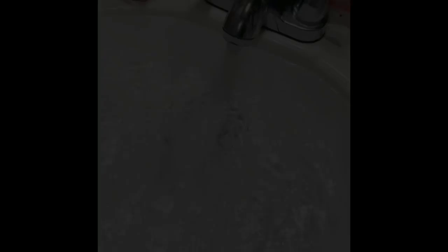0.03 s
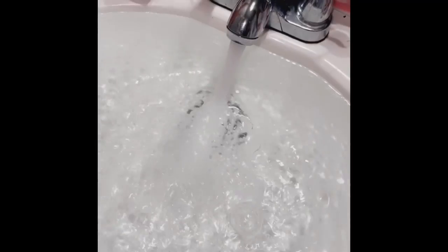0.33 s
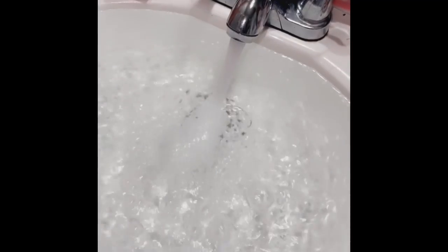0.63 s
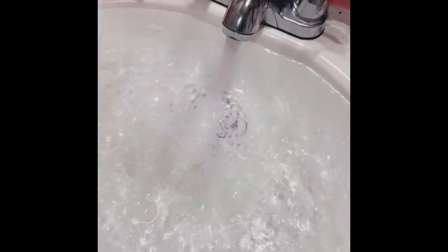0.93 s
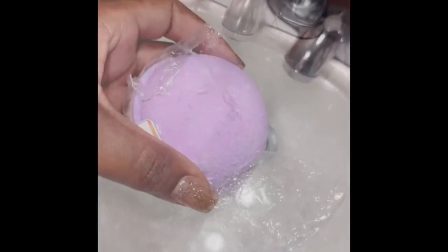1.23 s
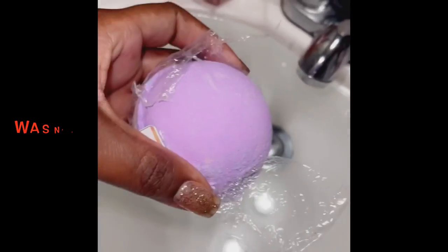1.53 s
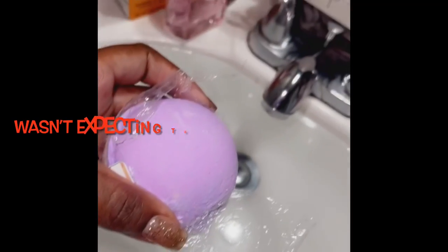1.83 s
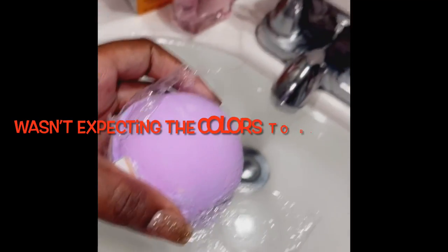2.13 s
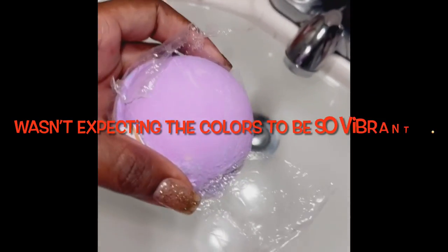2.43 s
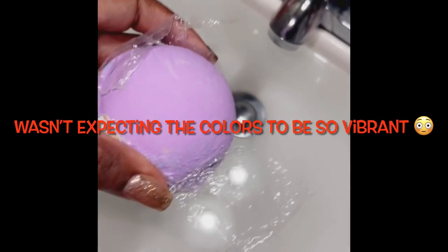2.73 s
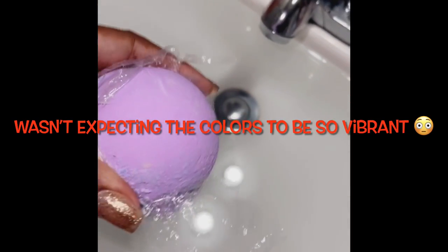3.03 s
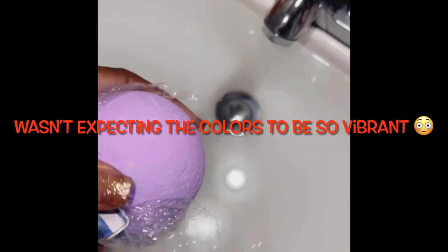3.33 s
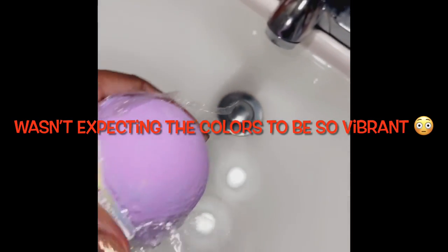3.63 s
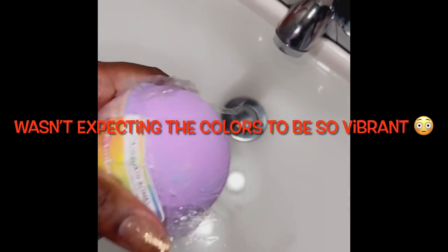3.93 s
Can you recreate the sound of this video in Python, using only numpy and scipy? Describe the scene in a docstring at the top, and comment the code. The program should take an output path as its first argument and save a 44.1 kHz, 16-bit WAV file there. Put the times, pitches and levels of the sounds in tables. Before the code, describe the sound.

Water runs into a basin, followed by fingers crackling the plastic film around a ball.

```python
"""An aerated tap hisses into a bathroom basin, its splash and foam a broadband noise, and fades away.
The steady room drone, probably a fan, grows louder as the recorder's automatic gain recovers after it.
Fingers then turn a ball wrapped in thin plastic film close to the microphone: the film rustles,
crackles in clumps and snaps as creases buckle. The small hard room answers it briefly."""
import sys
import numpy as np
from scipy import signal
from scipy.fft import rfft, irfft, next_fast_len
from scipy.io import wavfile
from scipy.ndimage import map_coordinates

SR = 44100
rng = np.random.default_rng(int(sys.argv[2]) if len(sys.argv) > 2 else 0)


def generate_wav(signal):
    """Clip the signal to [-1, 1] and save it as 16-bit WAV at the path in sys.argv[1]."""
    frames = np.transpose(np.atleast_2d(signal))
    scaled = np.clip(frames, -1, 1) * 32767
    pcm = np.round(scaled).astype(np.int16)
    wavfile.write(sys.argv[1], SR, pcm)


N = 176400
TIME_S = np.arange(N) / SR


def amp(db):
    """The decibel scale: 20 dB is a tenfold amplitude."""
    return 10 ** (np.asarray(db) / 20)

def unit(x):
    """Normalisation to rms 1."""
    return x / np.sqrt(np.mean(x ** 2) + 1e-20)

def curve(rows):
    """Linear interpolation of (time_s, value) rows at every sample."""
    return np.interp(TIME_S, *np.transpose(rows))

def wobble(knots_per_s):
    """Slow random modulation: a spline through Gaussian knots."""
    knots = rng.standard_normal(int(N * knots_per_s / SR) + 4)
    return map_coordinates(knots, [TIME_S * knots_per_s])

def colour(spectrum, hz, resonances=()):
    """Magnitude response: a broad spectrum and its resonances add in power."""
    knot_hz, knot_db = np.transpose(spectrum)
    power = amp(np.interp(np.log(hz + 1), np.log(knot_hz + 1), knot_db)) ** 2
    for centre_hz, width_hz, gain_db in resonances:
        power += amp(gain_db) ** 2 / (1 + ((hz - centre_hz) / width_hz) ** 2) ** 2
    return np.sqrt(power)

def shaped(x, spectrum, resonances=()):
    """Minimum-phase filtering: folding the cepstrum makes the response causal."""
    size = 2 * next_fast_len(len(x) * 5 // 8, True)
    gain = colour(spectrum, np.fft.rfftfreq(size, 1 / SR), resonances)
    cepstrum = irfft(np.log(gain + 1e-9))
    cepstrum[1:size // 2] *= 2
    cepstrum[size // 2 + 1:] = 0
    return irfft(rfft(x, size) * np.exp(rfft(cepstrum)))[:len(x)]

def noise(spectrum, resonances=()):
    """Source and filter: white noise takes on a spectrum, at rms 1."""
    return unit(shaped(rng.standard_normal(N), spectrum, resonances))

def grains(per_s, low_hz, high_hz, decay_cycles, spread_db):
    """Shot noise: tiny damped oscillations add at random times, pitches and strengths."""
    when, pitch, weakness, phase = rng.random((int(per_s * N / SR), 4)).T[:, :, None]
    hz = low_hz + (high_hz - low_hz) * pitch
    age = np.arange(64)
    cycles = hz * age / SR
    gain = amp(-spread_db * np.log(.05 + weakness)) * np.sqrt(hz)
    rings = gain * np.exp(-cycles / decay_cycles) * np.sin(2 * np.pi * (cycles + phase))
    samples = (when * N).astype(int) + age
    return unit(np.bincount(samples.ravel(), rings.ravel(), minlength=N)[:N])

def puffs(rows, spectrum):
    """Amplitude modulation: half-cosine envelopes cut short puffs from coloured noise."""
    envelope = sum(amp(level_db) * np.cos(np.pi * np.clip((TIME_S - centre_s) / length_s, -.5, .5))
                   for centre_s, length_s, level_db in rows)
    return envelope * noise(spectrum)


def reverberation(x, t60_s=0.11, delay_s=0.0026, gain_db=-10.5):
    """Diffuse reflections from basin and walls decay exponentially."""
    t = np.arange(SR // 2) / SR
    tail = rng.standard_normal(len(t)) * amp(-60 * t / t60_s) * (t > delay_s)
    return amp(gain_db) * signal.fftconvolve(x, tail / np.linalg.norm(tail))[:N]


# Steady air noise, heard louder as the recorder's gain recovers: time_s, level_db
AIR_LEVEL = [(.9, -113), (1.1, -66.5), (1.27, -64), (1.42, -59), (1.6, -57.5), (2.2, -55), (2.7, -53.5),
             (3.1, -52), (3.5, -48.5), (4.0, -47)]
# Its broad spectrum: frequency_hz, gain_db
AIR_SPECTRUM = [(25, -20), (60, -5.5), (125, -7), (200, -17.5), (300, -8.5), (420, -4), (720, -8.5),
                (1050, -4.5), (1450, -11.5), (1750, -12), (3000, -20), (4700, -29.5), (6400, -33),
                (7800, -30), (10200, -47), (13500, -43), (15700, -53)]
# Narrow peaks in the drone, among them its low hum: centre_hz, width_hz, gain_db
DRONE_RESONANCES = [(63, 8.2, 5), (144.6, 15.2, 2.5), (167, 6.4, 3), (243.3, 19.7, -3), (414, 10, 0.5),
                    (458, 4.9, 0.5), (496.3, 12, 6.5), (551.6, 18, 0), (635, 10, -2.5), (1060, 41, -1),
                    (1385, 114, -3.5)]
# Steady motor hum, heard louder as the recorder's gain recovers: time_s, level_db
HUM_LEVEL = [(.9, -100), (1.3, -82), (1.6, -64.5), (2.0, -67.5), (3.0, -65), (3.6, -59)]

def drone(hum_hz=165.1, waver_db=2.5):
    """Air noise carries the drone's narrow peaks; a motor hum wavers in amplitude and phase."""
    air = noise(AIR_SPECTRUM, DRONE_RESONANCES)
    waver = amp(waver_db * wobble(6.86))
    phase = 2 * np.pi * hum_hz * TIME_S + 0.43 * wobble(4.96)
    hum = unit(waver * np.sin(phase))
    return amp(curve(AIR_LEVEL)) * air + amp(curve(HUM_LEVEL)) * hum


# A fingertip slides on the film: centre_s, length_s, level_db
FINGER_SLIDES = [(2.182, 0.01, -63), (2.23, 0.11, -69.5)]
# Its bright spectrum: frequency_hz, gain_db
SLIDE_SPECTRUM = [(1000, -19), (6000, -23), (8000, 5), (10300, -8), (13500, -8), (16000, -4)]
# Fingers shift on the ball: centre_s, length_s, level_db
FINGER_RUBS = [(2.93, 0.092, -57), (3.91, 0.19, -57)]
# Their dull spectrum: frequency_hz, gain_db
RUB_SPECTRUM = [(25, -23), (65, 11), (160, 3), (220, -7), (450, 11), (1000, -16), (1500, -4), (3000, -40)]

def finger_friction():
    """Sliding friction makes brief noise: bright on the film, dull on the ball."""
    return puffs(FINGER_SLIDES, SLIDE_SPECTRUM) + puffs(FINGER_RUBS, RUB_SPECTRUM)


# How hard the fingers work the film: time_s, relative_db
HANDLING_LEVEL = [(1.0, -120), (2.1, -99), (2.3, -86), (2.64, -80.5), (2.73, -68), (2.775, -58.5),
                  (2.85, -65.5), (2.91, -58.5), (2.945, -60.5), (3.0, -51.5), (3.1, -58.5), (3.16, -53),
                  (3.225, -61), (3.265, -51.5), (3.345, -55), (3.38, -49.5), (3.405, -45), (3.475, -52.5),
                  (3.487, -45), (3.6, -53.5), (3.67, -47), (3.7, -43.5), (3.73, -48.5), (3.77, -55.5),
                  (3.865, -43), (3.915, -49.5), (4.0, -50)]
# Spectrum of the film, for crinkles and snaps alike: frequency_hz, gain_db
FILM_SPECTRUM = [(100, -41), (400, -0.5), (1100, 3), (2000, -0.5), (3200, -2.5), (4700, -0.5), (6500, -5.5),
                 (7900, 2.5), (9300, -7.5), (10400, -15), (12000, -7.5), (14000, -2.5), (15700, -3)]

def film_crinkle(flutter_db=1.8, gain_db=-1.5):
    """Impulsive crackle and continuous rustle share one envelope, set by the fingers."""
    clicks = grains(per_s=1800, low_hz=710, high_hz=14700, decay_cycles=0.87, spread_db=2.2)
    crackle = unit(shaped(clicks, FILM_SPECTRUM))
    rustle = noise(FILM_SPECTRUM)
    envelope = amp(curve(HANDLING_LEVEL) + gain_db + flutter_db * wobble(110))
    return envelope * (crackle + rustle)


# Single creases giving way: start_s, relative_db, centre_hz, half_width_octaves
CREASE_SNAPS = [(1.978, -54, 7760, 0.53), (2.183, -42, 4620, 1.5), (2.663, -54, 7000, 1.5),
                (2.709, -49, 5000, 1), (2.749, -46.5, 4000, 0.75), (2.7655, -44, 8000, 1.4),
                (2.774, -37, 7900, 1.6), (2.7995, -45, 7000, 1.2), (2.807, -38, 8100, 2),
                (2.833, -44, 13000, 0.72), (2.8951, -35, 6760, 0.72), (2.914, -35.5, 7000, 0.78),
                (2.991, -34, 7500, 1.1), (3.018, -31.5, 3300, 0.78), (3.064, -37, 3660, 0.28),
                (3.074, -39, 4300, 1.2), (3.137, -37.5, 3900, 0.45), (3.172, -35.5, 5600, 0.71),
                (3.195, -31.5, 1110, 0.44), (3.254, -35, 4500, 1.7), (3.295, -46, 6000, 1.6),
                (3.314, -32.5, 3260, 1.3), (3.36, -26.5, 5400, 1.1), (3.3885, -33, 5000, 0.76),
                (3.3989, -21.5, 3000, 1.4), (3.4001, -25.5, 5370, 1.2), (3.407, -34, 7000, 0.83),
                (3.44, -38, 4200, 1.1), (3.462, -34, 7500, 1.2), (3.4778, -24.5, 4840, 1.5),
                (3.486, -32, 5070, 1.2), (3.501, -36, 4000, .9), (3.624, -39, 7600, 0.64),
                (3.691, -26.5, 1900, 1.3), (3.695, -29, 5500, 1.3), (3.7002, -32, 3400, 1.7),
                (3.706, -29.5, 4200, 1.4), (3.716, -30, 2700, 1.1), (3.784, -34.5, 5200, .7),
                (3.8158, -29, 5200, 0.93), (3.8215, -26, 6900, 2.5), (3.831, -32.5, 5000, .7),
                (3.8525, -27.5, 3650, 0.78), (3.858, -30.5, 3800, 0.9), (3.8612, -31, 6000, 1.8),
                (3.876, -30, 5560, 1.3), (3.892, -33, 7000, 1), (3.9398, -29, 4100, 1.1),
                (3.957, -38, 7000, 1)]

def film_snaps(crack_t60_s=0.0061, shiver_t60_s=0.035, shiver_db=-21, gain_db=-23):
    """Buckling: a crease gives a sharp crack, then a shiver as the film around it settles."""
    out = np.zeros(N + SR)
    t = np.arange(2048) / SR
    hz = np.fft.rfftfreq(len(t), 1 / SR)[1:]
    decay = amp(-60 * t / crack_t60_s) + amp(shiver_db - 60 * t / shiver_t60_s)
    for start_s, relative_db, centre_hz, half_width_octaves in CREASE_SNAPS:
        band = 1 / (1 + (np.log2(hz / centre_hz) / half_width_octaves) ** 2)
        response_db = 20 * np.log10(band * colour(FILM_SPECTRUM, hz))
        burst = rng.standard_normal(len(t)) * decay
        snap = unit(shaped(burst, np.column_stack([hz, response_db])))
        out[round(start_s * SR):][:len(t)] += amp(relative_db + gain_db) * snap
    return out[:N]


# Low bumps as the water starts: centre_s, length_s, level_db
ONSET_BUMPS = [(.056, 0.028, -59.5), (.092, 0.058, -58.5)]
# Their spectrum: frequency_hz, gain_db
BUMP_SPECTRUM = [(25, -15), (60, -3), (130, -5), (260, -13), (500, -21.5), (2000, -78)]

def water_onset():
    """Onset transients: two puffs of low noise mark the start of the flow."""
    return puffs(ONSET_BUMPS, BUMP_SPECTRUM)


def water_noise(spectrum, resonances=(), fizz_db=-6.5):
    """Superposition: smooth hiss and grainy fizz pass through one filter, at rms 1."""
    fizz = grains(per_s=3000, low_hz=900, high_hz=17400, decay_cycles=1.8, spread_db=2.5)
    return unit(shaped(rng.standard_normal(N) + amp(fizz_db) * fizz, spectrum, resonances))


# Rise and fall of the tap's hiss: time_s, level_db
TAP_LEVEL = [(.043, -45.5), (.25, -44.5), (.5, -42.5), (.87, -41), (1.03, -42), (1.19, -43.5), (1.3, -47.5),
             (1.4, -58), (1.44, -76), (1.52, -115)]
# Spectrum of the jet's splash: frequency_hz, gain_db
SPLASH_SPECTRUM = [(30, -26), (62, -4.5), (90, -18), (135, -7.5), (220, -18), (560, -11.5), (800, -10.5),
                   (1250, -17), (1700, -19), (2400, -7.5), (2900, -7.5), (3700, -16.5), (8000, -36)]
# The basin rings under the jet: centre_hz, width_hz, gain_db
BASIN_RESONANCE = [(1064, 92, -3)]
# Spectrum of the foam's sizzle: frequency_hz, gain_db
SIZZLE_SPECTRUM = [(2000, -51), (4100, -14), (5500, -10), (7800, -8), (10300, -10), (12300, -10.5),
                   (13500, -2.5), (14700, -1.5)]
# Lift of the sizzle as foam gathers: time_s, relative_db
FOAM_LIFT = [(.3, 0), (.92, 1), (1.3, 0)]

def tap(start_s=0.043, splash_db=-13):
    """Forced resonance: the splashing jet drives the basin, while its foam sizzles above it."""
    splash = amp(splash_db + 0.45 * wobble(20.2)) * water_noise(SPLASH_SPECTRUM, BASIN_RESONANCE)
    sizzle = amp(curve(FOAM_LIFT) + 0.41 * wobble(31.3)) * water_noise(SIZZLE_SPECTRUM)
    return (splash + sizzle) * amp(curve(TAP_LEVEL)) * (TIME_S > start_s)


def scene():
    """Sound pressures add at one microphone, heard in both ears; only the film reverberates."""
    film = film_crinkle() + film_snaps() + finger_friction()
    mono = tap() + water_onset() + drone() + film + reverberation(film)
    return np.array([mono, mono])

def record(dry, cutoff_hz=15800, edge_hz=300):
    """Band limiting: a low-pass filter with a raised-cosine edge removes the highest treble."""
    size = next_fast_len(N + SR // 2)
    hz = np.fft.rfftfreq(size, 1 / SR)
    ramp = np.clip((cutoff_hz - hz) / edge_hz + .5, 0, 1)
    return irfft(rfft(dry, size) * np.sin(ramp * np.pi / 2) ** 2, size)[:, :N]


dry = scene()
out = record(dry)
generate_wav(out)
```